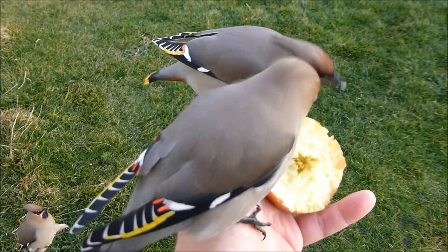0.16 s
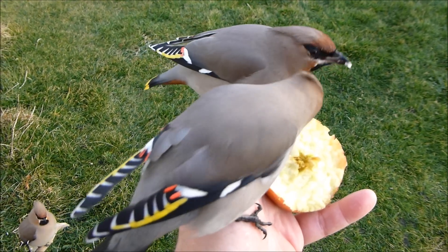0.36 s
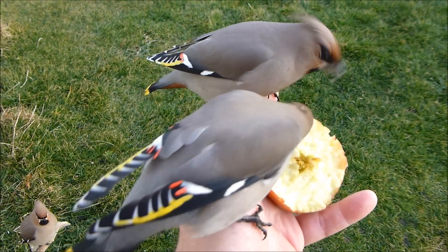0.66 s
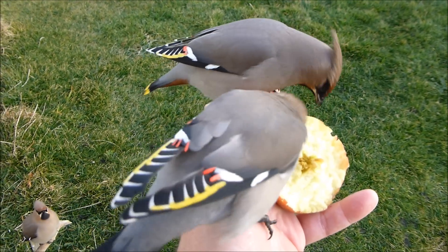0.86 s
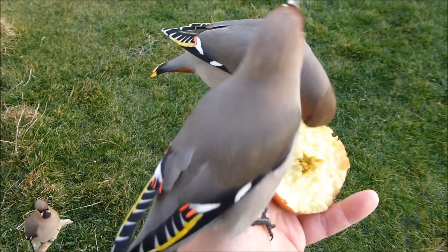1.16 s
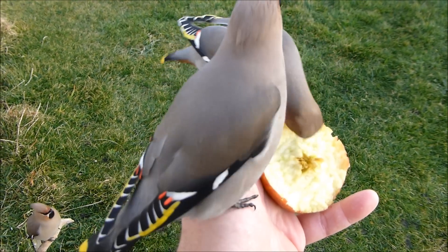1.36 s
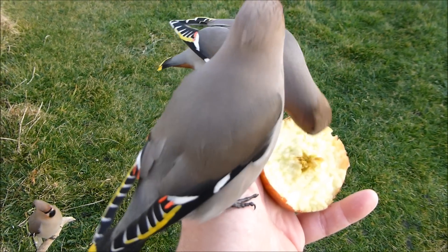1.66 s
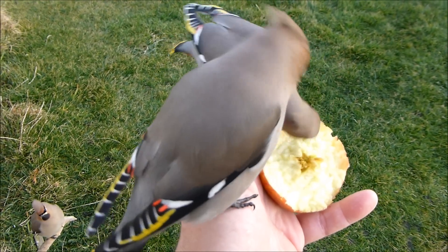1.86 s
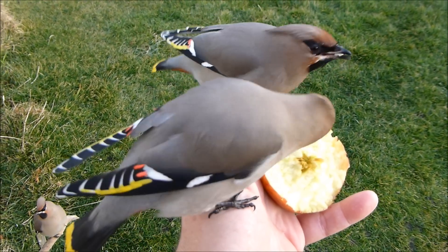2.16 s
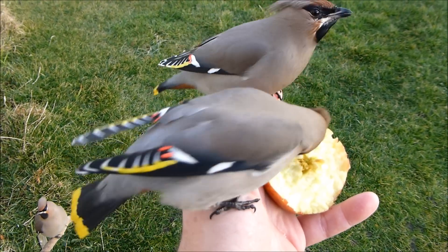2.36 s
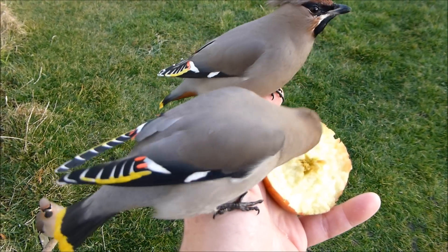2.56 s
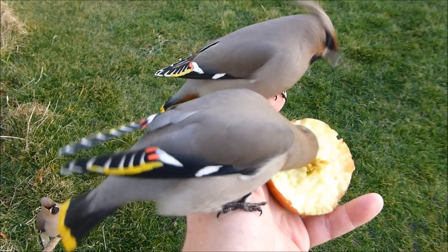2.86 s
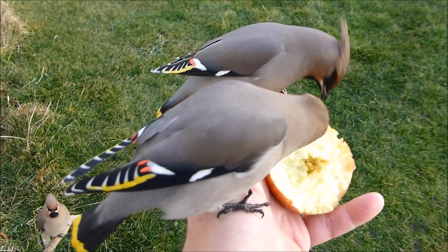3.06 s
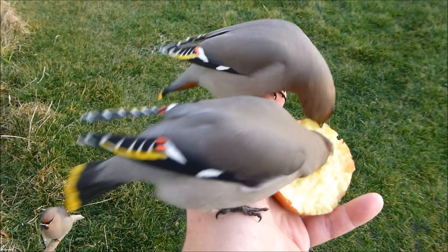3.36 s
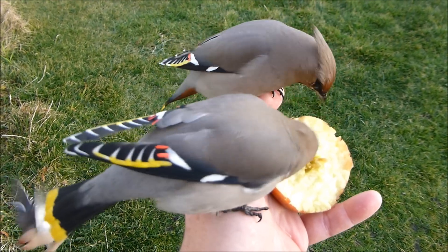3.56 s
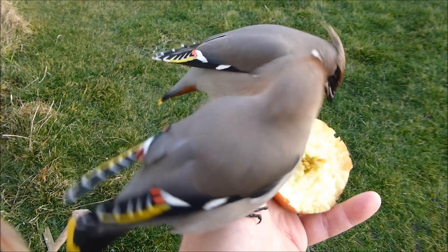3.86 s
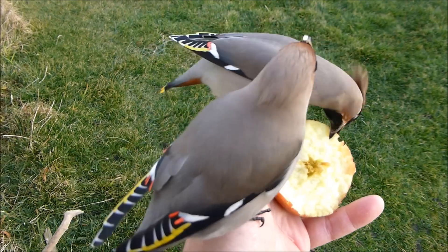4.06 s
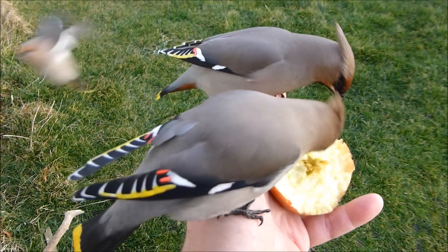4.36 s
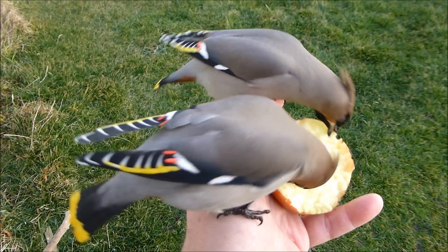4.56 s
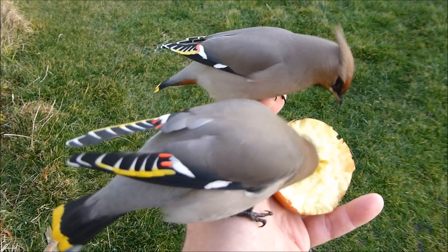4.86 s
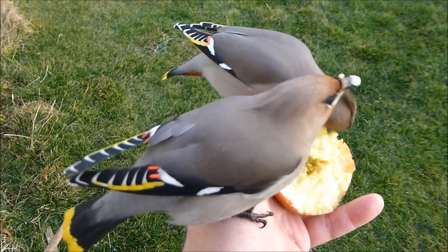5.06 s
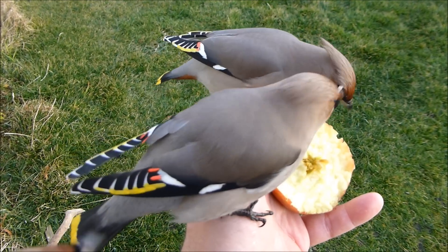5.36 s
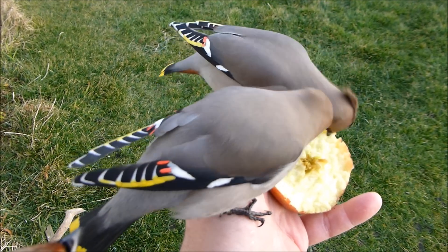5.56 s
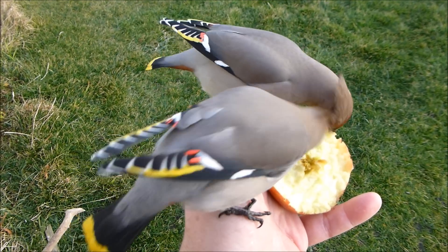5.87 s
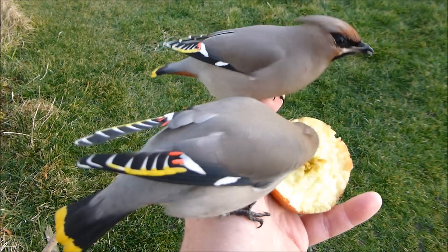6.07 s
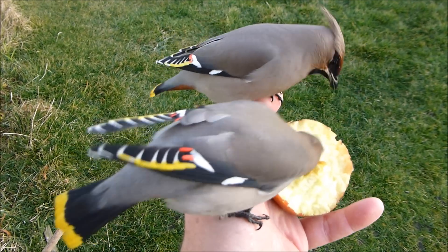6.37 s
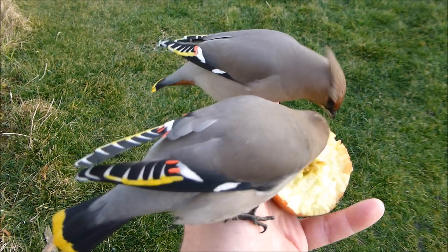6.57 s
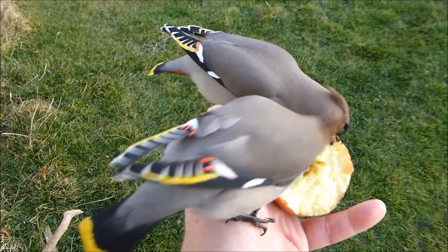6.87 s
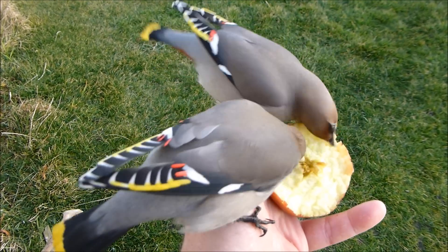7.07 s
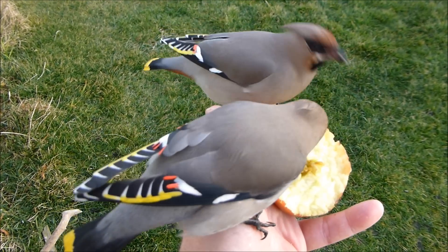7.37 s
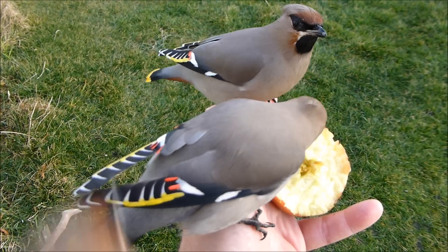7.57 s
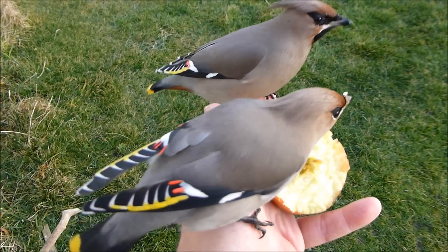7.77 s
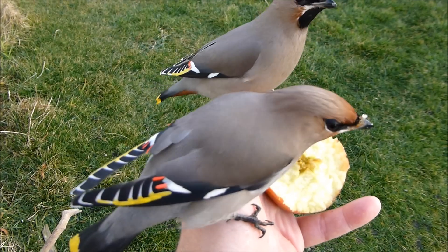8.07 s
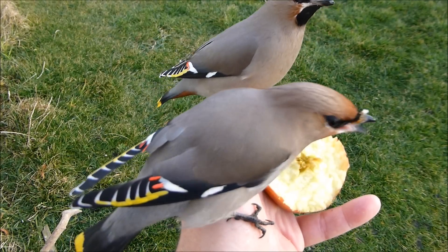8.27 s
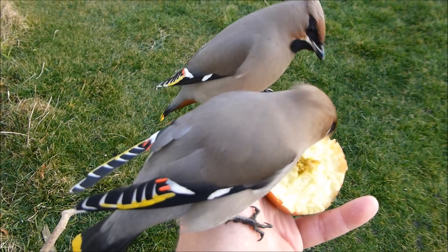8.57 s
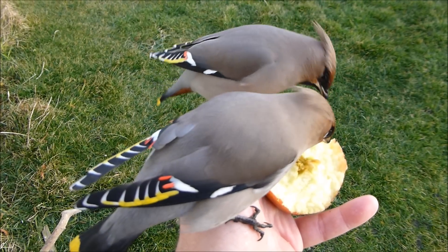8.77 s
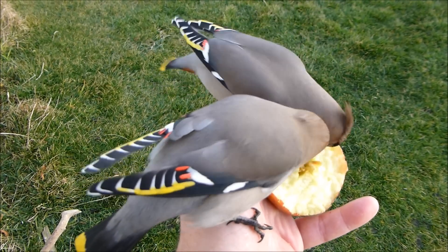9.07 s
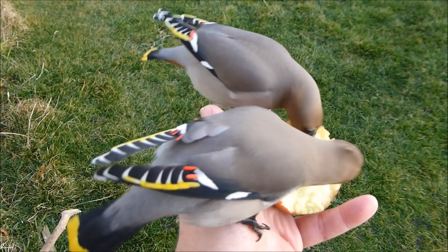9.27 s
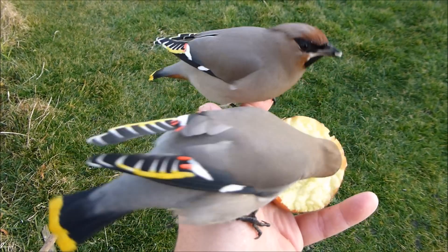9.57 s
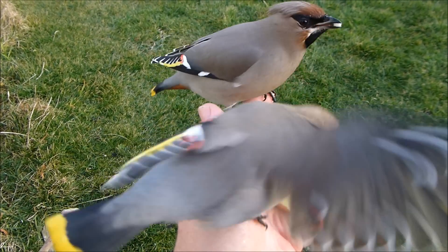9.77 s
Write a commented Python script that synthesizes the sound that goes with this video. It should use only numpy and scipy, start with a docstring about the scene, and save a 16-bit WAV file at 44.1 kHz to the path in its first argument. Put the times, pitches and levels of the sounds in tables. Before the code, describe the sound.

Very close outdoor sound of small birds feeding on an apple in a hand. Dry bill ticks lead into short wet crackles of torn fruit, with feet scuffing and feathers rustling. High, thin trills come in brief runs. Near eight seconds a sharp loud rap hits by the microphone, followed by puffs of wing air and taps, then the longest, clearest trill. Behind lies a soft, distant hush.

```python
"""Outdoors, right in front of the microphone, waxwings jostle on a hand and peck at an apple.
Their trills are runs of gliding near sines with echoes; bills tick and ring, fruit tears in noise crackles.
Feathers rustle and feet scuff and scratch as coloured, grainy noise; wing air puffs in low noise swells.
One sharp rap by the microphone rings a damped body; a soft noise hush and one far-off call lie behind."""
import sys
import numpy as np
from scipy import signal
from scipy.fft import rfft, irfft, next_fast_len
from scipy.io import wavfile

SR = 44100
rng = np.random.default_rng(int(sys.argv[2]) if len(sys.argv) > 2 else 0)


def log_audio(samples):
    """Write samples as a 16-bit WAV file to the path given in sys.argv[1]."""
    # one column per channel
    frames = np.atleast_2d(samples).T
    # limit to full scale, then quantise
    limited = np.clip(frames, -1, 1)
    pcm = np.round(limited * 32767).astype(np.int16)
    wavfile.write(sys.argv[1], SR, pcm)


N = 437031
TIME = np.arange(N) / SR  # s

# feet shuffling on the hand: t/s, level/dB
SHUFFLE = [(0.0, -57), (0.96, -48.5), (1.13, -46.5), (1.29, -43), (1.9, -56), (3.2, -60.5), (3.5, -51.5),
           (3.78, -40.5), (4.05, -50.5), (4.63, -49.5), (4.82, -56), (5.1, -61), (5.37, -55.5), (7.11, -57),
           (7.36, -52.5), (7.86, -43), (8.0, -48), (8.22, -59), (9.4, -57.5), (9.9, -49.5)]


def undb(db):
    """Turn decibels into a gain."""
    return 10 ** (np.asarray(db) / 20)


def unit(x):
    """Scale to rms 1."""
    return x / np.sqrt(np.mean(x ** 2))


def pan(db):
    """Left and right gains, averaging 1, for a left minus right level in dB."""
    gains = undb(np.array([[db], [-db]]).reshape(2, -1) / 2)
    return gains / gains.mean(axis=0)


def curves(table):
    """Join the points of each table column by straight lines, one value per sample."""
    s, *columns = np.transpose(table)
    return [np.interp(TIME, s, column) for column in columns]


def add(out, s, sound):
    """Mix a stereo sound in at time s."""
    i = int(s * SR)
    out[:, i:i + sound.shape[1]] += sound[:, :N - i]


def colour(x, spectrum):
    """Filter x by a curve of (f/Hz, level/dB) points, then scale to rms 1."""
    hz, db = np.transpose(spectrum)
    size = next_fast_len(x.shape[-1])
    bins_hz = np.maximum(np.arange(size // 2 + 1) * SR / size, 1)
    gain = undb(np.interp(np.log(bins_hz), np.log(hz), db))
    return unit(irfft(rfft(x, size) * gain, size)[..., :x.shape[-1]])


def noise(size, apart):
    """Stereo noise: a shared part plus a separate part for each side."""
    return unit(rng.standard_normal(size) + apart * rng.standard_normal((2, size)))


def walk(rate, t=TIME):
    """Random wander with a spread near 1, drawn anew `rate` times a second."""
    knots = np.arange(0, t[-1] + 1, 1 / rate)
    return np.interp(t, knots, rng.standard_normal(len(knots))) * np.sqrt(3 / 2)


def grains(size, rate, spread_db, grain_ms):
    """Envelope of many tiny slips of unequal strength, `rate` a second on average, at rms 1."""
    strength_db = spread_db * np.minimum(rng.exponential(size=size), 4)
    slips = (rng.random(size) < rate / SR) * undb(strength_db)
    fade = np.exp(-1000 / (grain_ms * SR))
    return unit(np.sqrt(signal.lfilter([1], [1, -fade], slips ** 2) + 1e-9))


def burst(length, hz, apart, slope_db):
    """A rounded swell of noise around one pitch, falling by about slope_db an octave on either side."""
    size = int(length * SR * 3 / 2)
    swell = noise(size, apart) * signal.windows.tukey(size, .8)
    # silence on both sides leaves room for the filter to ring
    padded = np.roll(np.pad(swell, ((0, 0), (0, size))), size // 2, axis=1)
    band = [(hz / 12, -3 * slope_db), (hz / 1.7, 0), (hz * 1.1, 0), (hz * 24, -4 * slope_db)]
    return colour(padded, band) * np.sqrt(3) * signal.windows.tukey(2 * size, .3)


def ringing(spectrum, ring_db, count=30):
    """Add chance peaks and dips to a spectrum, so that no two contacts ring alike."""
    hz = np.geomspace(700, 17000, count)
    return np.c_[hz, np.interp(hz, *np.transpose(spectrum)) + ring_db * rng.standard_normal(count)]


def hush(level_db=-54, wander_db=0.28):
    """Distant murmur of air and roads, much alike on both sides in the bass, diffuse in the treble."""
    # tone of the murmur: f/Hz, level/dB
    hush_spectrum = [(25, 15), (59, -9.5), (130, 0.5), (250, -1.5), (335, 7), (430, -1), (600, 3),
                     (1160, -7), (2000, -18), (3100, -23), (4900, -18.5), (10700, -24), (14400, -22.5),
                     (16000, -48)]
    side = colour(rng.standard_normal(N), [(100, -17), (600, -7.5), (2000, 9.0), (6000, -0.5)])
    air = rng.standard_normal(N) + 1.66 * side * np.array([[1], [-1]])
    return colour(air, hush_spectrum) * undb(level_db + wander_db * walk(2.4))


def far_call(width_hz=110):
    """A distant call, smeared by the open air into a narrow band that swells and fades."""
    # the one faint call: t/s, length/s, f/Hz, level/dB
    s, length, hz, db = (5.35, .38, 1630, -67)
    t = np.arange(int(length * SR)) / SR
    sine_part = walk(2 * width_hz, t) * np.sin(2 * np.pi * hz * t)
    cosine_part = walk(2 * width_hz, t) * np.cos(2 * np.pi * hz * t)
    tone = unit(sine_part + cosine_part)
    out = np.zeros((2, N))
    add(out, s, pan(0) * undb(db) * tone * signal.windows.tukey(len(t), .5))
    return out


def wing_air(base_hz=195, octave_db=35):
    """Eddies from the wings reach each microphone port differently; stronger ones are higher."""
    # puffs of air on the microphone: t/s, length/s, level/dB
    puffs = [(.26, 0.0265, -62), (0.478, 0.05, -58), (2.163, 0.036, -58), (7.768, .035, -42.5),
             (7.824, .016, -33), (7.841, 0.028, -35.5), (7.864, .025, -28), (7.902, 0.012, -30.5),
             (7.919, 0.039, -43.5), (7.957, .013, -34.5), (8.136, .036, -54), (8.229, .081, -62),
             (8.432, 0.044, -65), (8.541, 0.027, -47.5), (8.603, 0.043, -46.5)]
    out = np.zeros((2, N))
    for s, length, db in puffs:
        # base_hz at -43.5 dB, an octave higher for every octave_db more
        hz = base_hz * 2 ** ((db + 43.5) / octave_db)
        add(out, s - length, undb(db) * burst(length, hz, apart=2.8, slope_db=24.0))
    return out


def rap(crack_db=-9.0, crack_s=0.0038, tail_db=-22, tail_s=0.012, lag_s=0.00011, leak_hz=110):
    """A hard hit cracks and two rebounds thud; a heavily damped body shakes the left port just first."""
    # the hard rap and its two rebounds: t/s, strength/dB, contact/ms, left minus right/dB
    hits = [(7.7413, 3.5, 0.3, 3.5), (7.7448, 0.5, 1.03, -3), (7.749, 3.5, 1.54, -4)]
    # ring of the rapped body: f/Hz, level/dB, time to fall 60 dB/s
    modes = [(164, -31, .04), (250, -26, 0.02), (468, -2.5, 0.0085), (904, -10.5, 0.018),
             (1456, -5, 0.0077), (2530, -6, 0.0056)]
    # tone of the crack: f/Hz, level/dB
    crack_spectrum = [(400, -5), (1400, 5.5), (2800, -2.5), (6000, -4), (10000, -8.5), (15000, -12)]
    out = np.zeros((2, N))
    t = np.arange(SR // 20) / SR
    ports = np.maximum(t - np.array([[0], [lag_s]]), 0)
    body = sum(undb(db) * np.sin(2 * np.pi * hz * ports) * undb(-60 * ports / t60) for hz, db, t60 in modes)
    # a small body radiates no deep bass
    body = signal.sosfilt(signal.butter(1, leak_hz, "highpass", fs=SR, output="sos"), body)
    for s, db, contact_ms, pan_db in hits:
        # a longer contact makes a duller thud
        push = np.hanning(int(contact_ms * SR / 1000) + 3)
        add(out, s, pan(pan_db) * undb(db) * signal.convolve(body, [push / push.sum()]))
    fade = np.exp(-(t / crack_s) ** 4) + undb(tail_db) * np.exp(-t / tail_s)
    crack = colour(noise(len(t), 0.44), crack_spectrum) * (1 - np.exp(-t / .00025)) * fade
    add(out, hits[0][0] - .0004, pan(6.0) * undb(crack_db) * crack)
    return out


def shuffling():
    """Feet shuffle on skin in coarse, dull grains of noise."""
    # tone of feet on skin: f/Hz, level/dB
    skin = [(40, -15), (80, -5.5), (160, 2.5), (300, 4), (600, -0.5), (1100, -8), (2000, -12),
            (4000, -21.5), (9000, -30)]
    steps = noise(N, 0.25) * grains(N, rate=130, spread_db=2, grain_ms=9.6) * undb(1.37 * walk(35))
    return colour(steps, skin) * undb(curves(SHUFFLE)[0]) * pan(1.0)


def scratching(scratch_db=-8, per_s=60, spread_db=3.5, pan_db=11):
    """Claws catch on the skin in small, sparse crackles whenever the feet shuffle."""
    # tone of claws on skin: f/Hz, level/dB
    claw = [(200, -18), (550, -3), (900, 3.5), (1300, -4.5), (1900, -4), (3000, -9), (4800, -6.5),
            (7000, -15), (15000, -20)]
    catches = noise(N, 0.46) * grains(N, rate=per_s, spread_db=spread_db, grain_ms=2.1)
    return colour(catches, claw) * undb(curves(SHUFFLE)[0] + scratch_db) * pan(pan_db)


def shoving():
    """Feet and wings shove and brush in short, dull noise swells."""
    # shoves and brushes: t/s, length/s, f/Hz, level/dB, left minus right/dB
    shoves = [(0.959, 0.013, 233, -45, 1), (1.028, .011, 385, -50, 2), (1.086, 0.018, 300, -49, 0),
              (1.147, .015, 220, -51, 0), (1.335, 0.013, 300, -47.5, -2), (1.393, 0.023, 810, -47, 8),
              (1.519, .014, 700, -52, 7), (3.792, .014, 160, -44, 0), (3.857, 0.019, 170, -46, 1),
              (3.872, .07, 840, -59.5, 8), (4.102, .03, 200, -57, 0), (6.813, 0.033, 650, -58.5, 2),
              (7.345, .016, 1020, -46, 10), (7.708, 0.049, 920, -50.5, 6), (7.772, 0.063, 700, -50.5, 3),
              (7.857, .02, 734, -46.5, 7)]
    out = np.zeros((2, N))
    for s, length, hz, db, pan_db in shoves:
        add(out, s - length, pan(pan_db) * undb(db) * burst(length, hz, apart=0.31, slope_db=12))
    return out


def rustling(feather_db=5.5, uneven_db=0.88, stroke_pan_db=7):
    """Feather barbs slip over each other in fine grains as the birds move and stroke their wings."""
    # plumage sliding: t/s, level before feather_db is added/dB, left minus right/dB
    rustle = [(0.0, -60, 2), (0.58, -60.5, 10.5), (0.66, -56.5, -3), (1.07, -59.5, 14), (1.41, -65, -1),
              (1.6, -63.5, 6), (2.87, -69.5, -2), (3.11, -66, 6.5), (3.42, -64.5, 0), (3.67, -60.5, 18),
              (4.25, -61.5, -7), (4.47, -59, 10), (4.8, -58.5, 0), (5.02, -67, 5), (6.28, -66, 5),
              (7.14, -53.5, 4), (7.33, -54.5, 8.5), (7.86, -50.5, 4), (8.08, -59.5, 6.0), (8.99, -57, 5.5),
              (9.07, -56, 2), (9.9, -58.5, 2)]
    # single strokes of a wing along the body: middle/s, length/s, level/dB
    wing_strokes = [(.77, 0.027, -49), (1.387, 0.13, -43), (1.504, 0.078, -48), (2.319, 0.045, -52),
                    (2.645, 0.039, -52), (3.01, 0.043, -52), (3.834, 0.21, -48), (4.174, 0.13, -51),
                    (4.287, 0.068, -50), (5.42, 0.1, -53.5), (5.863, 0.083, -53), (6.12, 0.03, -51.5),
                    (8.124, 0.055, -52)]
    # tone of feathers: f/Hz, level/dB
    feather = [(500, -11), (1200, 3.5), (2200, 2.5), (3300, 3), (5000, 7.5), (7500, 5.5), (11000, 4),
               (15000, -4), (17000, -18)]
    level_db, pan_db = curves(rustle)
    sliding = undb(level_db + feather_db + uneven_db * walk(14)) * pan(pan_db)
    strokes = sum(undb(db) * np.exp(-(2 * (TIME - s) / length) ** 2) for s, length, db in wing_strokes)
    barbs = noise(N, 0.86) * grains(N, rate=2800, spread_db=-2.0, grain_ms=1.0) * undb(1.8 * walk(70))
    return colour(barbs, feather) * np.hypot(sliding, strokes * pan(stroke_pan_db))


def peck(db, knock_db, tick_db=5, knock_ms=4, tail_db=-15, tail_ms=10):
    """A dry tick, shorter when harder, over a dull knock."""
    # tone of the tick: f/Hz, level/dB
    tick_spectrum = [(700, -2), (1500, -4), (2400, 6.5), (5000, 12), (8000, 6.5), (14000, 0.5), (17000, 6)]
    # tone of the knock: f/Hz, level/dB
    knock_spectrum = [(80, -19), (200, -7.5), (500, -4.5), (1100, -6), (2000, -14.5), (5000, -28.5)]
    t_ms = np.arange(SR // 12) * 1000 / SR
    contact = 1 - np.exp(-(t_ms / 1.2) ** 4)
    # 2.59 ms at -38 dB, half that when 26 dB harder
    decay_ms = 2.59 * 2 ** (-(db + 38) / 26)
    fade = np.exp(-(t_ms / decay_ms) ** 2) + undb(tail_db) * np.exp(-t_ms / tail_ms)
    tick = colour(noise(len(t_ms), 0.11), ringing(tick_spectrum, ring_db=3)) * fade
    knock = colour(noise(len(t_ms), 0.17), knock_spectrum) * np.exp(-t_ms / knock_ms)
    return undb(db) * contact * (undb(tick_db) * tick + undb(knock_db - 6) * knock)


def snap(db, bill_hz=5020, bill_t60_s=0.029, bill_db=-6.5):
    """The bill closes with a tick and rings briefly, at a slightly different pitch each time."""
    tick = peck(db, knock_db=-28)
    t = np.arange(tick.shape[1]) / SR
    hz = bill_hz * (1 + 0.037 * rng.standard_normal())
    ring = np.sin(2 * np.pi * hz * t) * undb(-60 * t / bill_t60_s) * (1 - np.exp(-(t / 0.0028) ** 2))
    return tick + undb(db + bill_db) * ring


def tearing(length, rise_s=0.0079, fizz_db=-7, fizz_s=0.064, fizz_hz=6500):
    """Cells of the fruit burst in a crackle that swells, holds and dies; a finer fizz of juice outlasts it."""
    # tone of tearing apple flesh: f/Hz, level/dB
    flesh = [(700, -8), (1500, 0.5), (2500, 4), (4500, 4), (8000, -2), (14000, -5), (17000, -35)]
    t = np.arange(SR // 2) / SR
    cells = noise(len(t), 0.11) * grains(len(t), rate=800, spread_db=2.5, grain_ms=0.57)
    juice = noise(len(t), .4) * grains(len(t), rate=700, spread_db=2.0, grain_ms=0.2)
    crackle = colour(cells, ringing(flesh, ring_db=2)) * np.exp(-(t / length) ** 3)
    fizz = colour(juice, [(fizz_hz / 6, -25), (fizz_hz, 0), (13000, -2), (17000, -12)])
    fizz = fizz * np.exp(-np.maximum(t - length, 0) / fizz_s)
    return (crackle + undb(fizz_db) * fizz) * (1 - np.exp(-t / rise_s))


def pecking(tear_lag_s=.008):
    """Bills snap and tear at the apple straight ahead; bills and claws tap, mostly to the left."""
    # bites, a snap and then tearing fruit: t/s, snap level/dB, tearing level/dB, tearing length/s
    bites = [(0.003, -45.5, -48.5, 0.046), (0.04, -39.5, -60, .02), (0.668, -30.5, -48.5, 0.052),
             (1.8342, -41.5, -44, 0.026), (1.8565, -40, -50, 0.072), (1.962, -46.5, -56.5, 0.076),
             (2.4135, -32.5, -50, 0.071), (2.508, -48, -54, 0.055), (2.8168, -33.5, -49.5, 0.076),
             (2.917, -45, -60, 0.14), (3.3658, -32.5, -46, .085), (3.45, -39, -48.5, 0.1),
             (3.564, -37.5, -67, .03), (4.581, -31, -51.5, 0.083), (4.7635, -40, -45.5, 0.02),
             (4.8254, -43, -62, 0.017), (4.857, -39.5, -51, 0.015), (4.9236, -42.5, -49.5, 0.024),
             (5.1654, -42, -56.5, 0.085), (5.683, -44, -57, .07), (5.997, -31, -47, .085),
             (6.308, -50, -68, .02), (6.3697, -33, -48.5, 0.083), (6.511, -51, -48.5, 0.02),
             (6.796, -41.5, -48, 0.057), (6.996, -29.5, -46, .13), (9.136, -39, -52, 0.043),
             (9.4736, -38.5, -53, 0.11)]
    # taps of bill and claw on fruit and hand: t/s, level/dB,
    # knock setting (the knock is this minus 11, relative to the tick)/dB, left minus right/dB
    taps = [(0.507, -37.5, 7.5, 10), (0.513, -37, 5, 10), (0.5804, -35.5, 11.5, 11), (0.636, -39.5, 8.5, 2),
            (0.9511, -26.5, 6, 12), (1.0692, -47, 15, 13), (1.2394, -45, 5, 16), (1.2615, -38.5, 1, 15),
            (1.3255, -24, 10, 9), (1.331, -28.5, -2, 16), (1.388, -34.5, 8, 1), (1.4013, -36, 0, 2),
            (1.4698, -42.5, 20.5, 4.5), (2.3028, -42, -6, 15), (3.0925, -40, -17, 11), (3.8671, -36, 16, 7),
            (4.1139, -41.5, 12, -5), (4.127, -42, 14, 0), (7.3643, -32.5, 9.5, 9.5), (7.625, -34, 6, 12),
            (7.9087, -29.5, 4.5, 4.5), (7.9749, -24.5, 4, 4.5), (8.0443, -40.5, 12.5, 4),
            (9.0621, -45.5, 15.5, 0)]
    out = np.zeros((2, N))
    for s, snap_db, tear_db, length in bites:
        add(out, s, snap(snap_db))
        add(out, s + tear_lag_s, undb(tear_db) * tearing(length))
    for s, db, knock_db, pan_db in taps:
        add(out, s, pan(pan_db) * peck(db, knock_db))
    return out


def note(length, top_hz, end_hz, sag, swell_ms, octave_db, depth, rise_s=0.00187, rise_share=0.267,
         plunge_s=0.0095, waver=0.006, flutter_db=1.0):
    """A near sine that leaps up, glides slowly and plunges in a hook as the syrinx (voice organ) lets go."""
    t = np.arange(int(length * SR)) / SR
    plunge = np.clip(1 - (length - t) / plunge_s, 0, 1)
    glide = np.clip((t - .005) / max(length - .012, .004), 0, 1) ** sag
    hz = top_hz + (end_hz - top_hz) * glide
    hz = hz * (1 - rise_share * np.exp(-t / rise_s))
    hz = hz * (1 - depth * np.sin(np.pi / 2 * plunge) ** 2)
    hz = hz * (1 + waver * walk(660, t))
    phase = 2 * np.pi * np.cumsum(hz) / SR
    swell = 1 - np.exp(-(t * 1000 / swell_ms) ** 2)
    force = swell * (1 - plunge) ** 0.73 * undb(flutter_db * walk(175, t))
    return force * (np.sin(phase) + undb(octave_db) * np.sin(2 * phase))


def trills(scatter_db=-18, scatter_s=.02):
    """Near echoes beat against each gliding note, and the lawn scatters a short haze after it."""
    # trill notes: t/s, length/s, top f/Hz, level/dB
    notes = [(1.564, 0.034, 6780, -42.5), (1.606, .04, 7200, -41), (1.653, 0.042, 7350, -37.5),
             (1.709, 0.036, 7100, -36), (3.286, .011, 5500, -44), (3.298, 0.041, 6550, -36),
             (3.357, 0.037, 7000, -46), (3.393, 0.035, 7230, -37.5), (3.46, .035, 6870, -39.5),
             (4.377, 0.028, 6200, -44), (4.433, .031, 6500, -46.5), (4.478, 0.04, 6500, -45),
             (4.53, 0.044, 6570, -46.5), (4.585, 0.04, 6550, -44.5), (4.643, 0.042, 6640, -49.5),
             (6.993, .014, 6300, -43), (7.015, 0.038, 6460, -38), (7.065, 0.05, 6850, -39),
             (7.121, .038, 6870, -42), (7.192, 0.042, 6450, -50), (7.98, 0.023, 6270, -38.5),
             (8.044, .021, 6400, -47), (8.102, .017, 6200, -43), (8.49, 0.024, 5700, -36.5),
             (8.515, 0.042, 6250, -37), (8.557, 0.05, 6600, -34), (8.608, 0.048, 6700, -33.5),
             (8.659, 0.049, 6700, -35), (8.711, 0.05, 6520, -36.5), (8.761, .049, 6600, -36)]
    # runs of notes; a bird that faces away is heard more by its echoes: from t/s, f each note glides to/Hz,
    # bend of the glide (1 is straight, more is arched), swell time/ms, left minus right/dB, echo level/dB,
    # octave level/dB, plunge depth (0 to 1)
    runs = [(1.5, 6400, 0.96, 3, 10, 6, -15, 0.13), (3.2, 6170, 1.13, 5.8, -4.5, 3.5, -13.5, 0.23),
            (4.3, 5860, 1.2, 7.4, 10, 5.5, -13, 0.15), (6.9, 6000, 1.12, 3, 10, 6, -16, .16),
            (7.9, 5980, 1.3, 4, 2, -7, -20, .14), (8.4, 5680, 0.71, 1.9, 12, 3, -20, 0.28)]
    # echoes from hand, body and lawn: delay/ms, left/dB, right/dB (the run's echo level is added)
    echoes = [(1.3, -35, -29), (4.4, -42, -21), (6.8, -13, -24), (11.5, -27, -18), (17.0, -17, -17)]
    direct, spill = np.zeros((2, 2, N))
    for s, length, top_hz, db in notes:
        latest_run = [run for run in runs if run[0] < s][-1]
        _, end_hz, sag, swell_ms, pan_db, echo_db, octave_db, depth = latest_run
        sound = pan(pan_db) * undb(db) * note(length, top_hz, end_hz, sag, swell_ms, octave_db, depth)
        add(direct, s, sound)
        add(spill, s, undb(echo_db) * sound)
    t = np.arange(SR // 6) / SR
    haze = unit(rng.standard_normal((2, len(t))) * np.exp(-t / scatter_s))
    response = undb(scatter_db) * haze / np.sqrt(len(t))
    for ms, left_db, right_db in echoes:
        response[:, int(ms * SR / 1000)] += undb([left_db, right_db])
    return direct + signal.fftconvolve(spill, response, axes=1)[:, :N]


def scene():
    """Birds, fruit and hand in the open air."""
    background = hush() + far_call()
    bodies = wing_air() + rap() + shuffling() + scratching() + shoving() + rustling()
    return background + bodies + pecking() + trills()


def record(dry, low_cut_hz=75, top_hz=15600):
    """The recorder thins the deep bass, clips at full scale and cuts the top."""
    thin = signal.sosfilt(signal.butter(2, low_cut_hz, "highpass", fs=SR, output="sos"), dry)
    top_cut = signal.ellip(8, .2, 70, top_hz, fs=SR, output="sos")
    return signal.sosfilt(top_cut, np.clip(thin, -1, 1))


dry = scene()
out = record(dry)
log_audio(out)
```